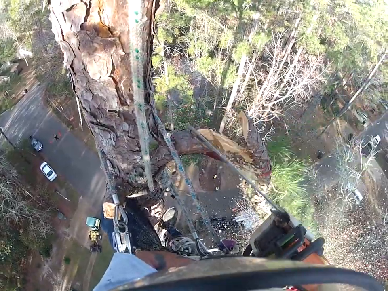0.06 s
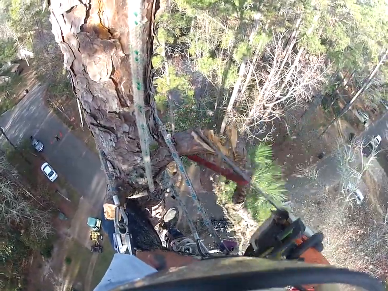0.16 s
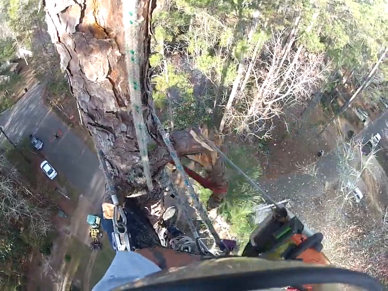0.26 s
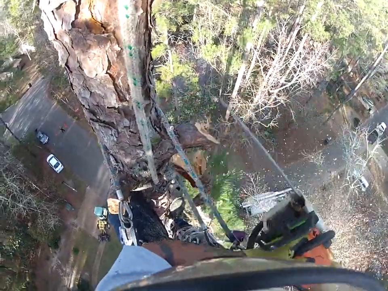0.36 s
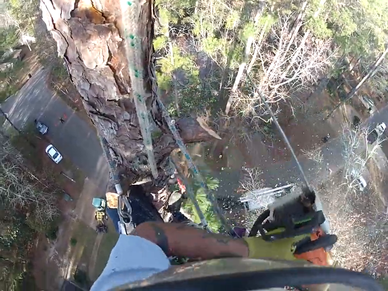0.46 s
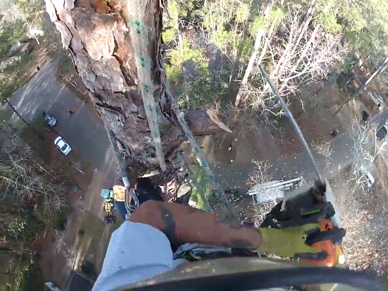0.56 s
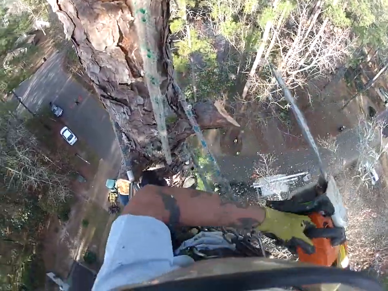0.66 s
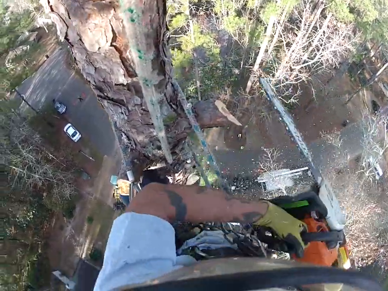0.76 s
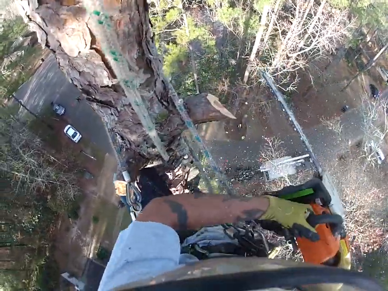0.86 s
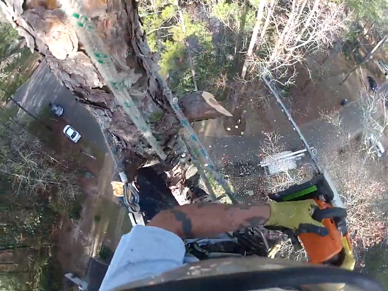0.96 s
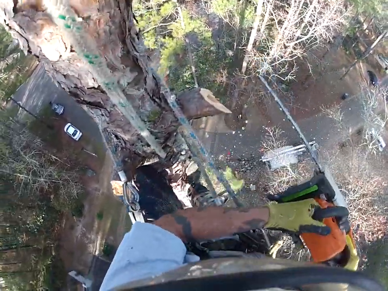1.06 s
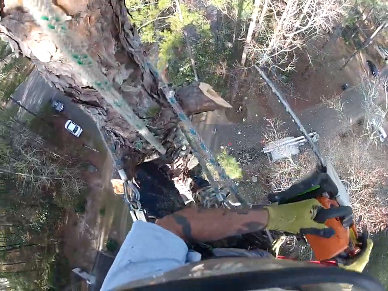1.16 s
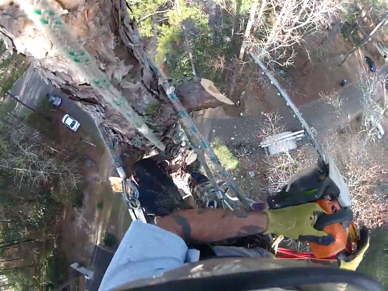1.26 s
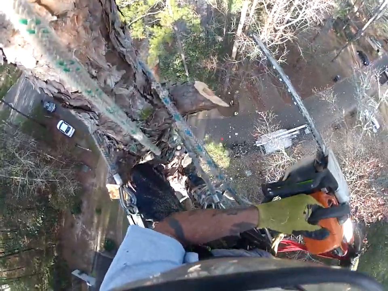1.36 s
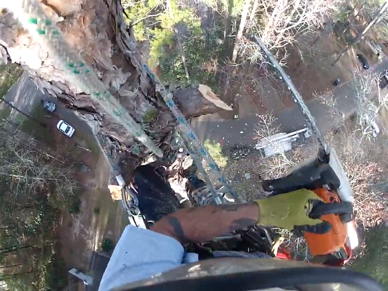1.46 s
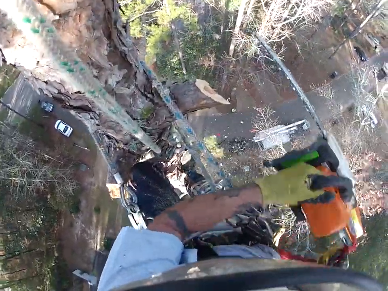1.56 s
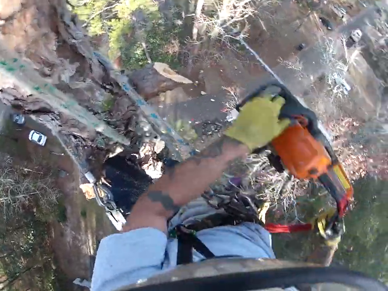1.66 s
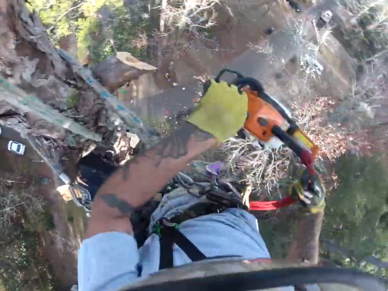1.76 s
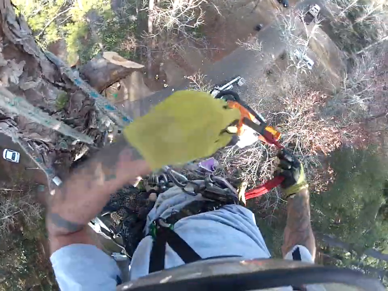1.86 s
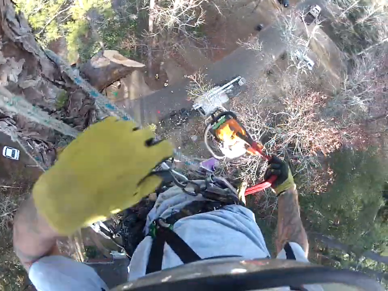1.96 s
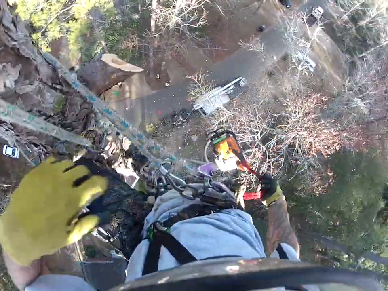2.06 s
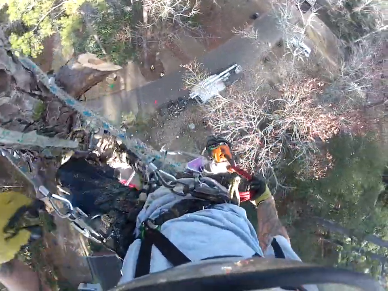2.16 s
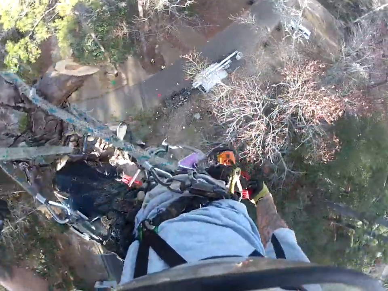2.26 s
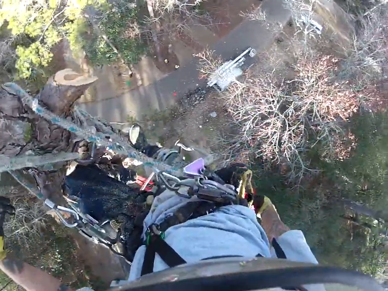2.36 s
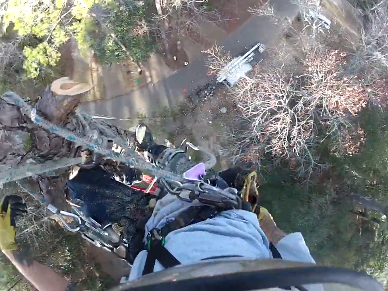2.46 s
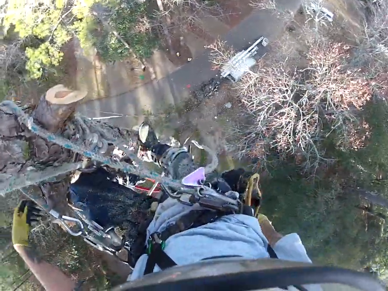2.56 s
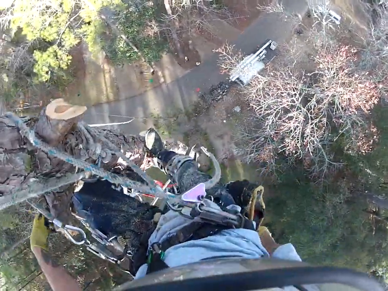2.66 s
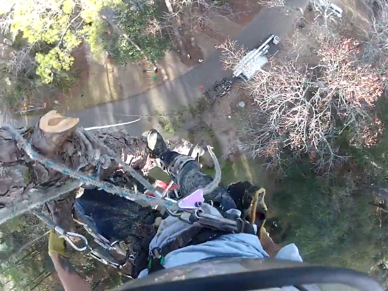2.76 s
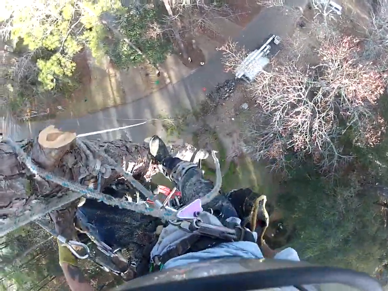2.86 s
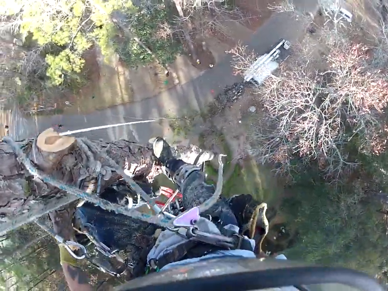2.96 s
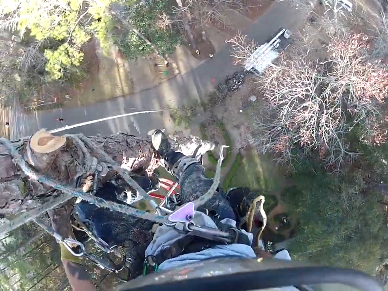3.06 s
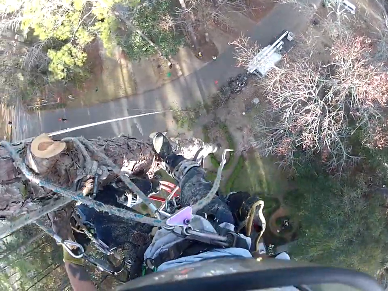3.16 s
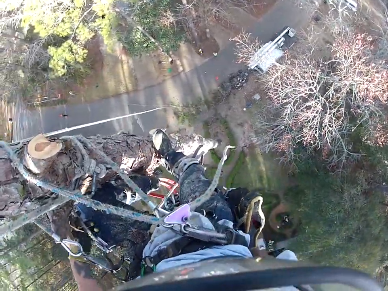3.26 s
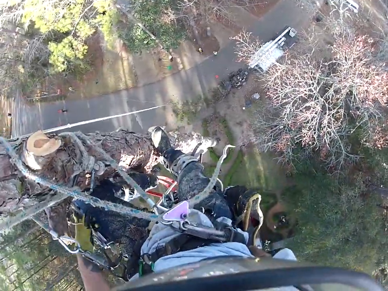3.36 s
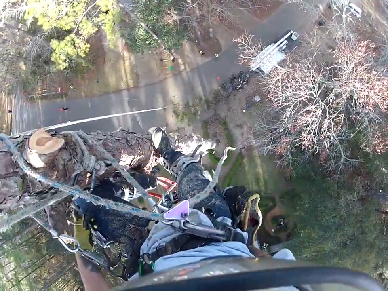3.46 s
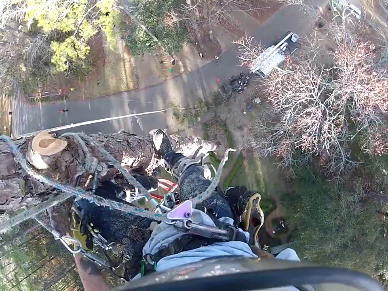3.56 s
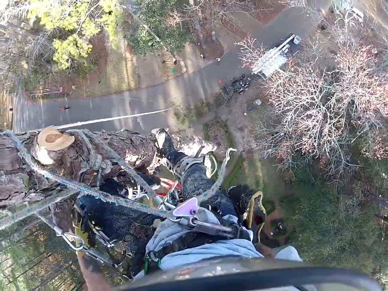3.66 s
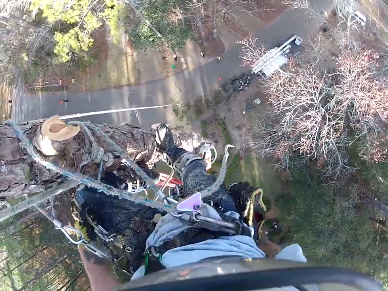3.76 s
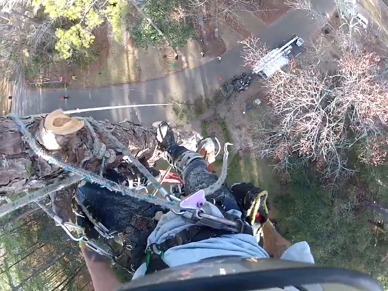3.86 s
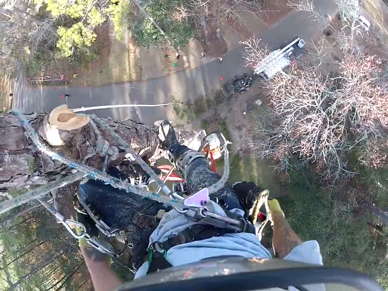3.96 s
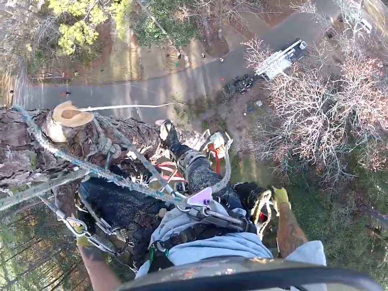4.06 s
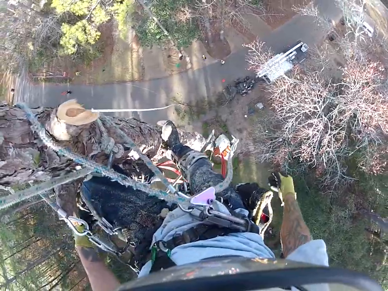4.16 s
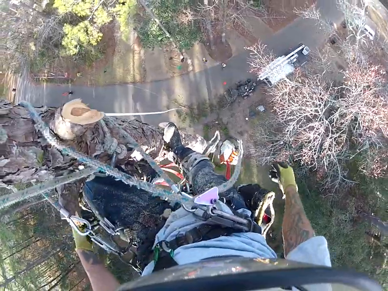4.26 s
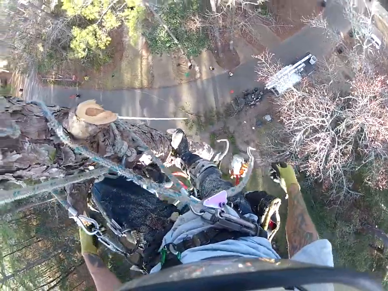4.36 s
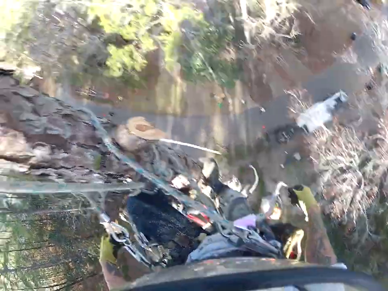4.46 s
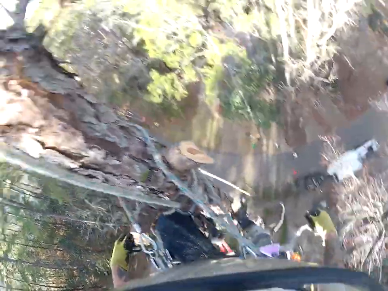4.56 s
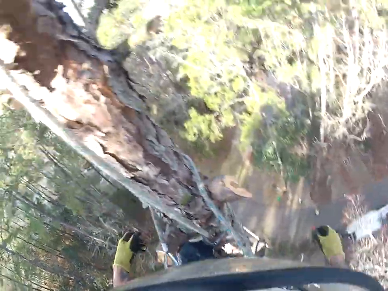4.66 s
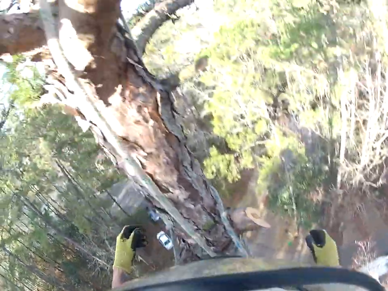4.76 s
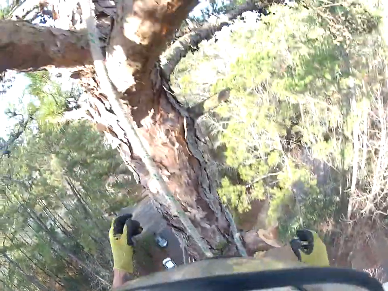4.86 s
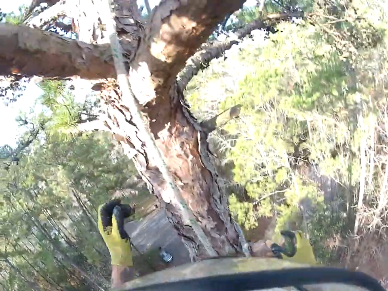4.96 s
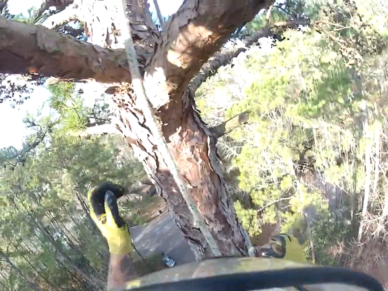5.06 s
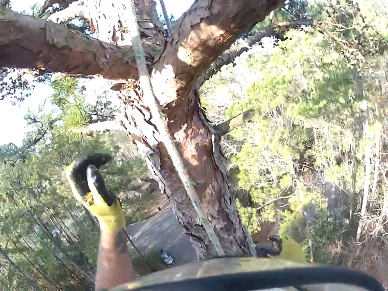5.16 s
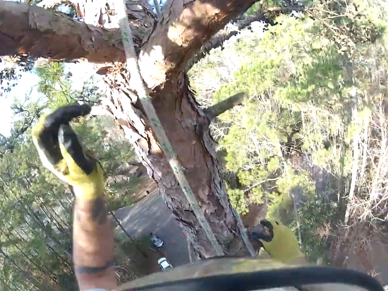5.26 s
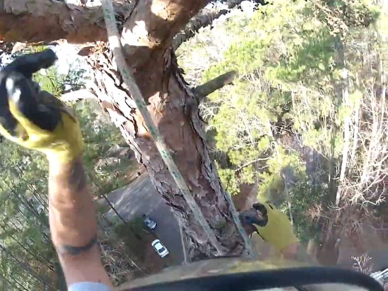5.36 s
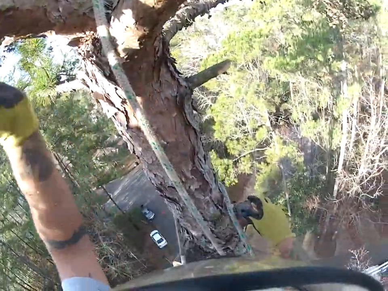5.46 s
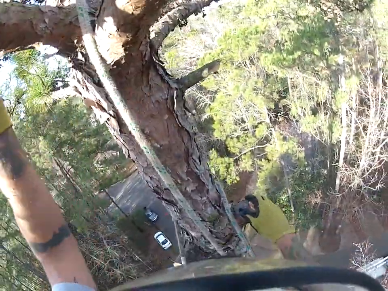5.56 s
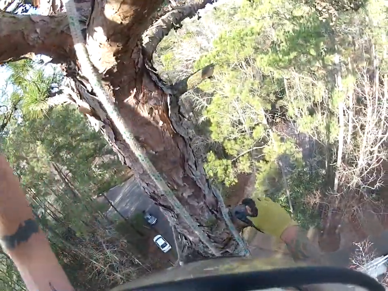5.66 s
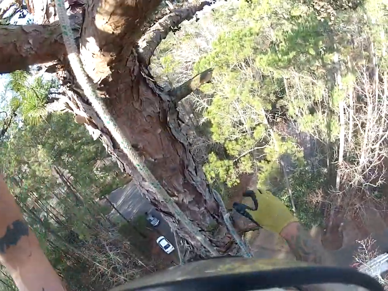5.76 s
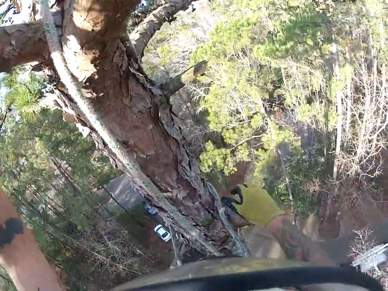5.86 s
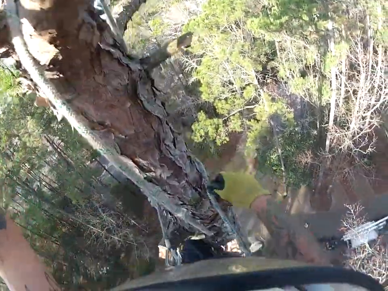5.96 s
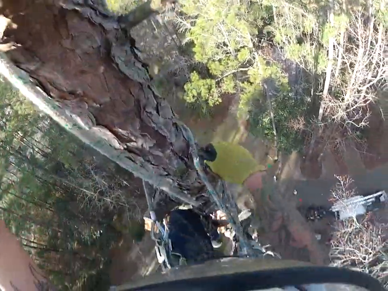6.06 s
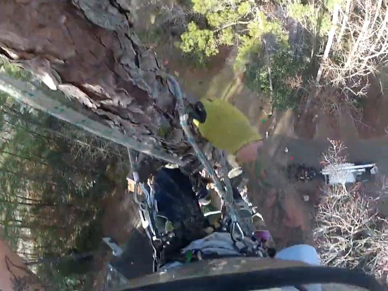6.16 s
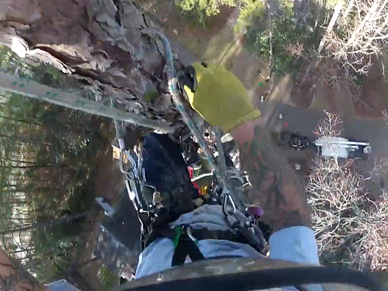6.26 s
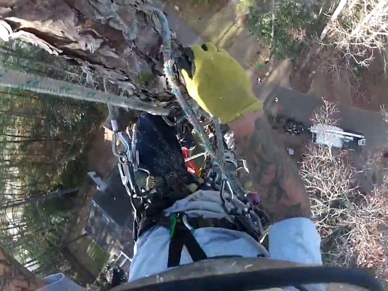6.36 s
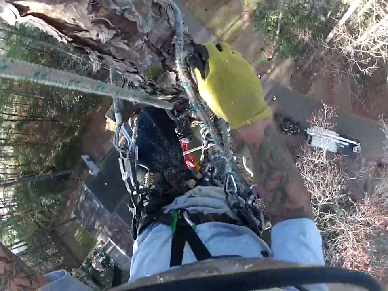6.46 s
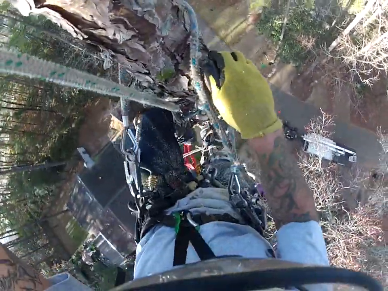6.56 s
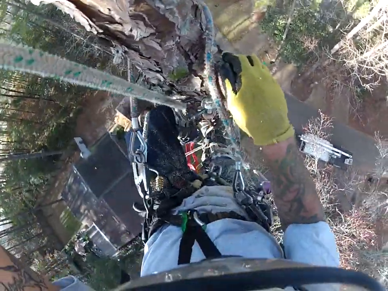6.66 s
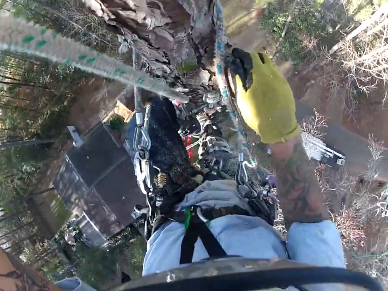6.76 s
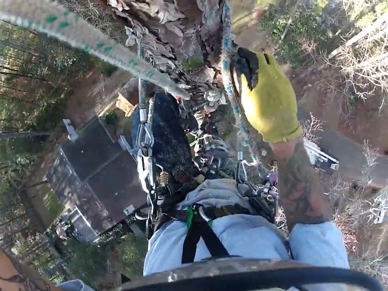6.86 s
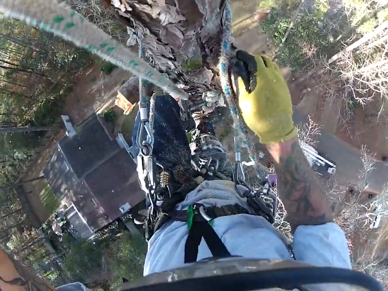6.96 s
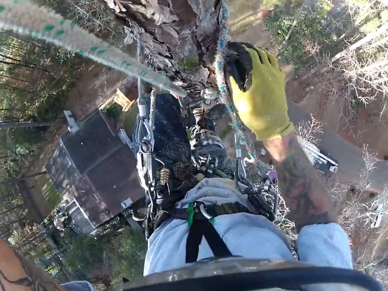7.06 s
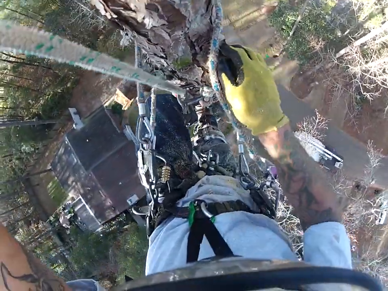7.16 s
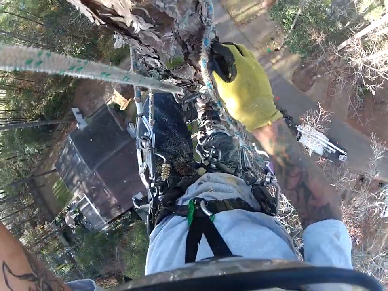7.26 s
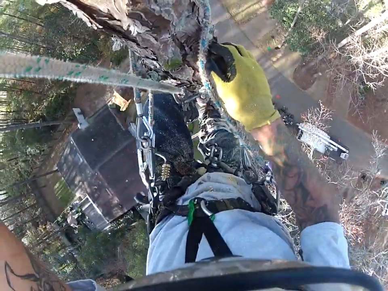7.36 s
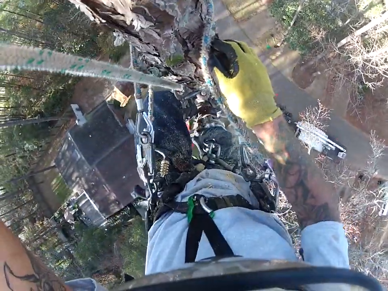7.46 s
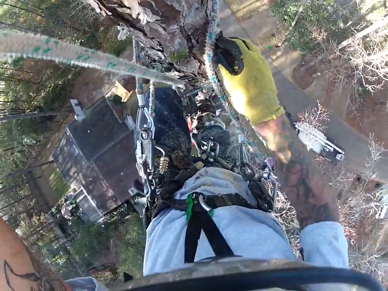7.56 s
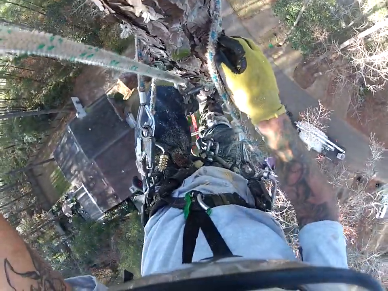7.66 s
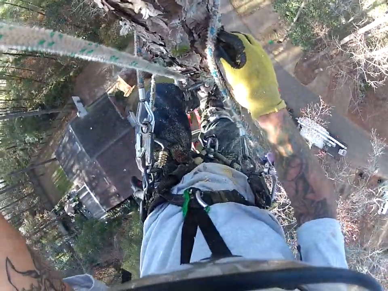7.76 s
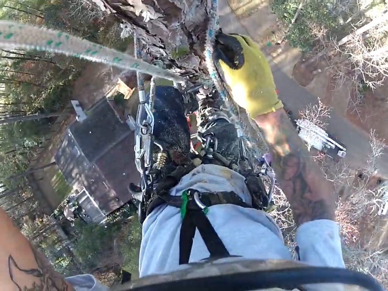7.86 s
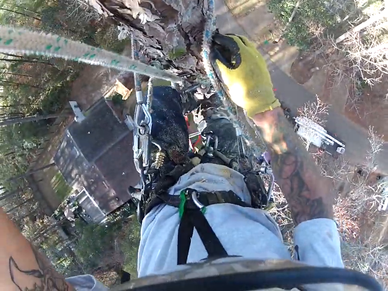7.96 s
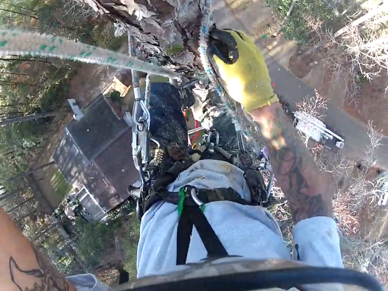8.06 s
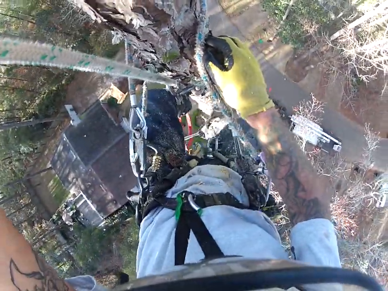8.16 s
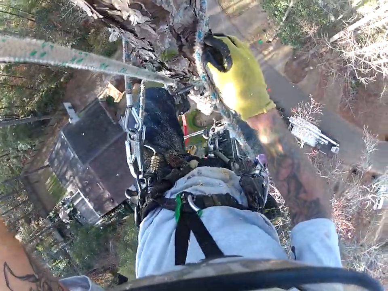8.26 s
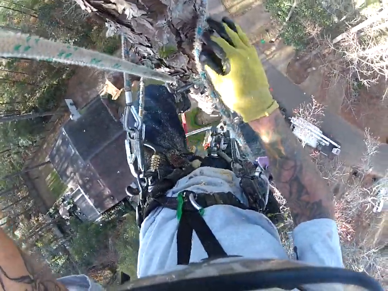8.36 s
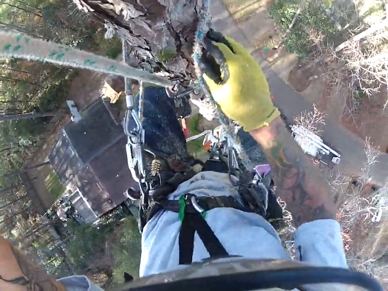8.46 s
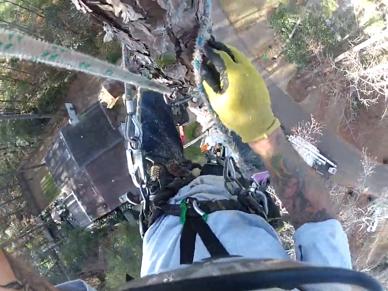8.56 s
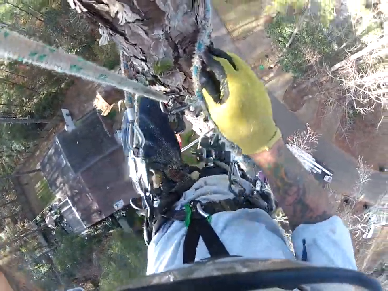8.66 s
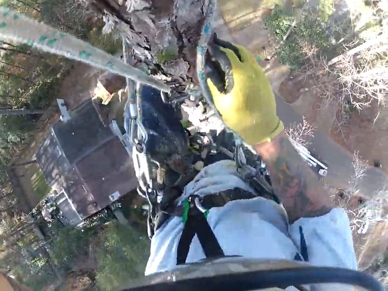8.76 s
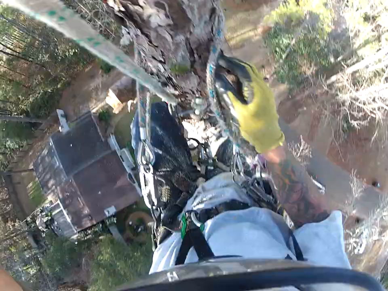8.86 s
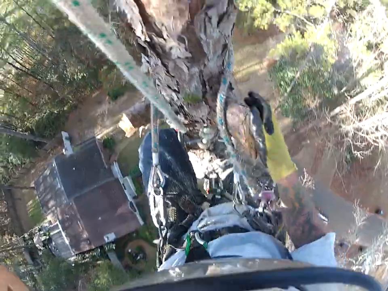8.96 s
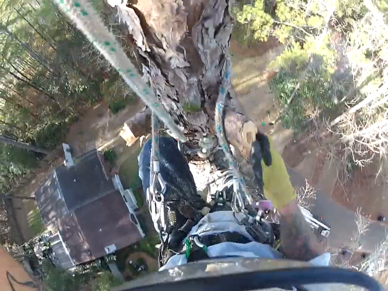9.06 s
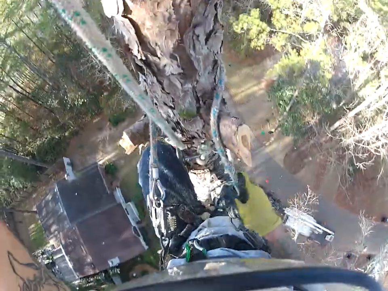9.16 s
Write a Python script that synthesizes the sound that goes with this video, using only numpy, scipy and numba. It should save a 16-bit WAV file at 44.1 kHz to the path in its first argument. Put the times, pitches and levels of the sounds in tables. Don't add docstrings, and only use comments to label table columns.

```python
import sys
import numpy as np
from scipy import signal
from scipy.fft import rfft, irfft
from scipy.io import wavfile
from scipy.ndimage import uniform_filter1d
from numba import njit

SR = 44100
rng = np.random.default_rng(int(sys.argv[2]) if len(sys.argv) > 2 else 0)


def volts(x):
    e = np.asarray(x, float) / 20
    return 10 ** e


def inscribe(sig):
    pcm = np.round(np.clip(np.atleast_2d(sig).T, -1, 1) * 32767)
    wavfile.write(sys.argv[1], SR, pcm.astype(np.int16))


N = 406161
T = np.arange(N) / SR

# centre_hz, width_hz, level_db
HOUSING = [(1070, 108, 0.5), (1546, 203, -6.5), (1850, 87, 4), (2293, 129, 1.5), (2934, 334, 3),
           (3605, 160, 3.5), (4330, 510, -10.5), (5635, 320, -8)]


def unit(x):
    return x / np.sqrt(np.mean(x ** 2))


def noise():
    return rng.standard_normal(N)


def curves(table):
    s, *columns = np.transpose(table)
    return [np.interp(T, s, c) for c in columns]


@njit
def svf(x, hz, widths):
    y, b, l = np.empty(len(x)), 0., 0.
    for i in range(len(x)):
        g, k = np.tan(np.pi * hz[i] / SR), widths[i] / hz[i]
        v = (b + g * (x[i] - l)) / (1 + g * (g + k))
        b, l, y[i] = 2 * v - b, l + 2 * g * v, k * v
    return y


def band(x, hz, width_hz):
    return signal.lfilter(*signal.iirpeak(min(hz, 5950), hz / width_hz, SR), x)


def modes(x, table):
    return sum((-1) ** k * volts(db) * band(x, hz, w) for k, (hz, w, db) in enumerate(table))


def walk(rate_hz, size=N):
    k = int(SR / rate_hz)
    steps = np.repeat(rng.standard_normal(size // k + 1), k)
    return 2.04 * uniform_filter1d(uniform_filter1d(steps, k), k)[:size]


def add(out, s, x):
    i = int(s * SR)
    out[i:i + len(x)] += x[:len(out) - i]


def fade(t60_s, size=8000):
    t = np.arange(size) / SR
    return t, np.exp(-np.log(1000) * t / max(t60_s, .004))


def steady(x, span_s):
    return x / np.sqrt(uniform_filter1d(x ** 2, int(span_s * SR)) + 1e-4 * np.mean(x ** 2))


def wind():
    # centre_s, peak_db, half_length_s
    gust_rows = [(2.253, -48, 0.043), (2.4, -45, 0.036), (2.54, -39, 0.048), (3.066, -43, 0.072),
                 (3.553, -52, 0.17), (4.207, -45, 0.049), (4.757, -38.5, 0.23), (5.417, -43, 0.055),
                 (5.76, -60, .06), (6.107, -49, 0.14), (6.802, -47, 0.087), (7.22, -44.5, 0.21),
                 (7.57, -58, 0.037), (8.032, -43, 0.065), (8.31, -58, 0.04), (8.528, -35, 0.036),
                 (8.802, -41.5, 0.39), (9.156, -47, .04)]
    calm_db, shake_db, shake_end_s = -51.5, -45, 1.7
    push = volts(calm_db) + volts(shake_db) * np.clip((shake_end_s - T) / 0.18, 0, 1)
    push = push + sum(volts(db) * np.exp(-((T - s) / half_s) ** 2) for s, db, half_s in gust_rows)
    gusts = band(noise(), 25, 30) + 0.53 * band(noise(), 102, 41)
    gusts = signal.sosfilt(signal.butter(3, 170, fs=SR, output="sos"), gusts)
    return push * volts(-11.0 + 2.54 * walk(32)) * unit(gusts)


def air():
    # time_s, swell_db, head_raised_0_to_1
    background = [(1.5, 0.5, 0.3), (2.0, -1.5, 0.2), (2.4, 0, 0.3), (3.26, 2, 0), (3.85, 2.5, 0.1),
                  (4.13, 7.5, 0.8), (4.4, 1.5, 0.4), (4.9, -0.5, 1), (5.3, -1.5, 0.95), (6.35, 1, 0.6),
                  (7.3, -1, .8), (8.3, -1, 0.5), (8.9, 0, .8)]
    # freq_hz, density_db_per_hz
    floor = [(12, -26), (20, 2.5), (101, 0.5), (559, -10), (710, -15.5), (1040, -13.5), (1380, -34.5),
             (2170, -16.5), (2630, -21), (3500, -21.5), (3940, -22), (5120, -42.5), (5900, -87),
             (7670, -72), (13000, -120)]
    floor_db, motor_hz, motor_end_s = -57, 112.3, 3.2

    swell_db, raised = curves(background)
    low_db = -64.5 + .4 * swell_db + 4.5 * raised
    upper_db = -61.5 + swell_db - raised
    leaf_db = -66.5 + .8 * swell_db - 0.5 * raised
    hum = volts(low_db + 0.83 * walk(9)) * unit(modes(noise(), HOUSING[:1]))
    hum += volts(upper_db + 0.39 * walk(6.1)) * unit(modes(noise(), HOUSING[1:4]))
    leaves = volts(leaf_db + .8 * walk(8)) * unit(modes(noise(), HOUSING[4:]))

    hz, db = np.transpose(floor)
    log_hz = np.log(np.arange(N // 2 + 1) * SR / N + 1)
    ground = unit(irfft(rfft(noise()) * volts(np.interp(log_hz, np.log(hz), db)), N))

    whine = volts(-80) * unit(band(noise(), 5050, 40))
    for order in (5, 6, 7):
        on = np.clip((motor_end_s - T) / .3, 0, 1) * volts(-79 + 2.5 * walk(2) + 1.5 * (order - 6))
        whine += on * np.sin(2 * np.pi * order * motor_hz * T + walk(4))
    return hum + leaves + volts(floor_db) * ground + whine


def rustle():
    # start_s, length_s, level_db
    brushes = [(3.334, 0.096, -53.5), (3.86, 0.17, -48), (6.58, 0.11, -58.5), (6.685, .07, -57),
               (7.02, 0.13, -56), (8.681, 0.075, -49), (8.86, 0.11, -53), (8.952, 0.04, -50)]
    attack_s, sag_db = 0.013, -16.5
    gain = 0
    for s, length_s, db in brushes:
        on = np.clip(np.minimum(T - s, s + length_s - T) / attack_s, 0, 1)
        gain = gain + on * volts(db + sag_db * np.clip((T - s) / length_s, 0, 1))
    grains = noise() * volts(0.66 * walk(150))
    return gain * unit(modes(grains, HOUSING[3:]) + 0.74 * band(grains, 4100, 3000))


def helmet():
    # start_s, peak_db, pitch_hz, t60_s
    bumps = [(0.959, -31, 89, 0.069), (2.23, -47.5, 34.8, 0.097), (3.009, -59, 80.7, 0.15),
             (3.1, -47, 113, 0.38), (3.442, -47.5, 72.5, 0.43), (4.565, -53, 54.6, 0.12),
             (4.772, -42, 32.6, 0.32), (7.141, -37.5, 91.5, 0.086), (7.174, -39.5, 120, 0.11),
             (7.543, -43.5, 62.7, 0.25), (7.959, -54, 140, 0.11), (8.506, -36, 65.4, 0.06),
             (8.799, -26.5, 102, 0.053), (8.81, -30, 32.4, 0.15), (8.979, -39, 106, 0.063),
             (9.02, -41.5, 115, 0.078)]
    # start_s, level_db, rise_s, t60_s
    rings = [
        (9.008, -47.5, 0.019, 0.25),
        (9.143, -47, 0.006, 0.053),
    ]
    ring_hz = 5386
    out = np.zeros(N)
    for s, db, hz, t60_s in bumps:
        t, decay = fade(t60_s)
        bump = np.sin(2 * np.pi * hz * t) * decay * (1 - np.exp(-t / 0.0058))
        add(out, s, volts(db) * bump / abs(bump).max())

    shove_s, shove_db, rise_s, swing_s, shove_hz = 8.7465, -17.5, .004, .028, 13
    t = T - shove_s
    out -= volts(shove_db) * np.tanh(t / rise_s) * np.exp(-(t / swing_s) ** 2) * np.cos(t * 2 * np.pi * shove_hz)

    for s, db, rise_s, t60_s in rings:
        t, decay = fade(t60_s, size=16000)
        add(out, s, volts(db) * 2 * np.sin(2 * np.pi * ring_hz * t) * decay * np.clip(t / rise_s, 0, 1))
    return out


def ticks():
    clips = 0.016, [(3.3458, -37.5, 4080), (5.9449, -45.5, 5060), (6.3061, -50, 5640), (6.6029, -46, 5560),
             (6.7206, -44, 5560), (6.7421, -36, 5800), (7.0364, -49, 5630), (7.2135, -45, 5620),
             (7.2325, -42, 5830), (7.9009, -52, 5350), (9.1306, -44, 4080), (9.1411, -41, 4900),
             (9.186, -55, 5400)]
    rope = .024, [(1.494, -74, 2960), (3.6416, -47, 2800), (6.7421, -41, 3520), (6.8738, -41, 3350),
            (7.2823, -44.5, 3420), (7.3213, -45, 3340), (8.094, -44, 2920), (8.6951, -37, 2950),
            (8.8697, -43, 3590), (8.9072, -44, 3820), (8.9306, -41, 2850), (8.9474, -51, 2880),
            (8.967, -42, 3450)]
    bark = 0.029, [(3.465, -49, 1800), (4.015, -44, 560), (4.697, -53, 1070), (4.734, -50, 1100),
            (4.77, -49, 1100), (4.791, -46, 1090), (7.131, -34.5, 1160), (7.166, -32, 990),
            (7.528, -48, 1110), (7.982, -42.5, 1050), (8.702, -35.5, 1850), (8.731, -32, 2020),
            (8.737, -43, 3000), (8.782, -42, 2500), (8.816, -32.5, 4050), (8.83, -39, 3000),
            (8.74, -38.5, 546), (8.747, -35.5, 1110), (8.805, -37, 2600)]
    out = np.zeros(N)
    for t60_s, rows in (clips, rope, bark):
        for s, db, hz in rows:
            t, decay = fade(t60_s)
            burst = rng.standard_normal(len(t)) * decay
            wide = band(band(burst, 1.37 * hz, 0.86 * hz), 1.37 * hz, 0.86 * hz)
            tick = band(band(burst, hz, 0.35 * hz), hz, 0.35 * hz) + 0.25 * wide
            if hz < 2400:
                tick = tick + 0.16 * modes(burst, HOUSING[:4])
            add(out, s, volts(db) * tick / abs(tick).max())
    return out


def knocks():
    # start_s, peak_db, pitch_hz, echo_db, shell_share_0_to_1
    knock_rows = [
        (.774, -7.5, 1930, -27, 0.23),
        (4.018, -21, 1800, -30.5, 0),
        (4.035, -33, 1840, -37, 0),
        (4.059, -28.5, 1850, -34, 0.9),
        (4.088, -39, 1860, -26, .2),
        (4.116, -39.5, 1890, -17, .2),
        (8.8142, -15.5, 2650, -41.5, 0.98),
    ]
    cycles, forest_t60_s = 61, 1
    out, wet = np.zeros(N), np.zeros(N)
    for s, db, hz, echo_db, shell in knock_rows:
        t, decay = fade(cycles / hz)
        crack = rng.standard_normal(len(t)) * decay * np.clip(t / 0.0017, 0, 1)
        airborne = modes(crack, HOUSING[:4]) - 0.33 * band(crack, *HOUSING[0][:2])
        airborne = airborne + 0.48 * modes(crack, HOUSING[4:])
        airborne = band(airborne, hz, 800) + 2.4 * airborne + 0.29 * band(crack, 670, 250)
        carried = band(band(crack, hz, 1100), hz, 1200) + 0.14 * band(crack, 0.88 * hz, 840)
        crack = (1 - shell) * airborne + shell * carried + 0.033 * crack
        add(out, s, volts(db) * crack / abs(crack).max())
        add(wet, s + .01, np.array([volts(db + echo_db)]))
    t, decay = fade(forest_t60_s, size=44100)
    trunks = unit(band(modes(rng.standard_normal(len(t)), HOUSING), 1600, 2700)) * decay
    return out + signal.fftconvolve(wet, trunks)[:N]


def muffler_puffs(hz, lit, braked, turn, since_s, chance):
    # centre_hz, width_hz, level_db
    muffler = [(190, 350, 13.5), (697, 28, 29), (1450, 410, -56)]
    free_width_hz, braked_width_hz, slow_hz, soft_hz = 520, 165, 39.4, 45
    puff_hz = np.clip(4.92 * hz, 248, 370)
    narrow_hz = np.clip(braked_width_hz * (slow_hz / hz) ** 2, braked_width_hz, 400)
    width_hz = free_width_hz + braked * (narrow_hz - free_width_hz)

    weak_db = (turn % 2) * (2.5 + 4 * abs(walk(22)))
    fired = volts(1.7 * chance - weak_db) * np.exp(-since_s / 0.00028)
    fired = band(fired, 610, 340) + 1.6 * modes(fired, muffler) + .5 * band(fired, 300, 70)
    fired = signal.sosfilt(signal.butter(4, 140, "highpass", fs=SR, output="sos"), fired)

    pumped = volts(.9 * chance) * np.exp(-since_s / 0.00024) * np.clip(hz / soft_hz, 0, 1) ** 2
    turbulence = np.clip(12 / hz - .05, 0, 1) * since_s / .004 * np.exp(-since_s / .005)
    pumped = pumped + turbulence * noise()
    port = 0.44 * band(pumped, 578, 113) + .5 * modes(pumped, HOUSING[:4])
    pumped = svf(svf(pumped, puff_hz, 1.4 * width_hz), puff_hz, 1.4 * width_hz) + port
    return lit * steady(fired, 0.19) + (1 - lit) * steady(pumped, 0.18)


def links_and_fins(turns, lit):
    firing_db = {10: -4, 14: -41, 15: -40.5, 16: -1, 19: -30.5, 21: -36.5, 22: -30.5, 24: 3.6, 26: 7.4, 27:
                 5.2, 31: 0.45, 37: 4.6, 38: 3.9, 40: -4.5}
    weak_db, fan_fins, free_db = -20, 13, 2.5
    angle = np.pi * turns[:SR // 2]
    size = len(angle)
    loaded = np.zeros(size)
    for k in range(9, 41):
        level = volts(firing_db.get(k, weak_db) + 2.1 * walk(31.7, size=size))
        loaded += level * np.sin(k * angle + 0.77 * walk(49.6, size=size) + 2 * np.pi * rng.random())
    loaded = np.pad(loaded, (0, N - size))

    orders = np.arange(37)
    weight = (orders > 5) + 1.3 * np.exp(-((orders - fan_fins) / 1.2) ** 2)
    pattern = irfft(weight * np.exp(2j * np.pi * rng.random(len(orders))))
    strikes = np.interp(turns % 1 * 72, np.arange(73), np.append(pattern, pattern[0]))
    free = modes(strikes, HOUSING[:6])
    free = free - .7 * band(free, 1560, 220) - .4 * band(free, 2230, 200) - .3 * band(free, 3450, 300)
    return lit * steady(loaded, .1) + (1 - lit) * steady(free, .08) * volts(free_db + 1.1 * walk(25))


def gas_flow(hz, lit, braked, turn, since_s, chance):
    loaded_share, coasting_share, braked_share = 0.75, 0.39, .75
    burst_db = lit * (3.9 * (turn % 2) + 1.8 * chance) + 1.6 * chance
    gas = volts(burst_db) * since_s * np.exp(-since_s / (0.0011 - 0.0006 * lit + 0.14 / hz))
    gas = gas / uniform_filter1d(gas, int(.15 * SR))
    share = lit * loaded_share + (1 - lit - braked) * coasting_share + braked * braked_share
    share = np.clip(share, 0, 1)
    return (share * gas + 1 - share) * noise()


def saw():
    # time_s, turns_per_s
    crank = [(.36, 180.8), (0.63, 124.5), (0.776, 99.45), (0.81, 68.9), (1.03, 50.98), (1.14, 37.93),
             (1.22, 24.2), (1.32, 17.7), (1.5, 10.61)]
    # time_s, rasp_db
    saw_level = [(0, -23), (.08, -19.5), (.35, -21), (.5, -26.5), (.78, -33), (.92, -36), (1.1, -44),
                 (1.25, -54.5), (1.55, -57.5)]
    # centre_hz, width_hz, level_db
    case = [(1750, 170, 3), (2350, 150, -1), (2850, 70, 1), (3450, 200, 1), (4700, 200, -4)]
    ignition_off_s, brake_s = .385, .7742
    bite_hz, bite_s = 5, .04

    (hz,), (rasp_db,) = curves(crank), curves(saw_level)
    hz = hz + bite_hz * np.exp(-T / bite_s)
    octaves = np.log2(crank[0][1] / hz)
    braked = np.clip((T - brake_s) / .03, 0, 1)
    lit = np.clip((ignition_off_s - T) / 0.012, 0, 1)
    puff_db = rasp_db - 7 + 4 * np.clip(octaves, 0, 8.1 - 1.63 * octaves)
    chain_db = rasp_db - 9.5 - 1.5 * octaves - 6 * braked
    whirr_db = -12 * braked

    turns = np.cumsum(hz) / SR
    turns = turns - turns[int(brake_s * SR)] - .07
    turn = np.floor(turns).astype(int)
    turn, since_s = turn - turn[0], turns % 1 / hz
    chance = rng.standard_normal((turn[-1] + 1, 2))[turn].T

    puffs = muffler_puffs(hz, lit, braked, turn, since_s, chance[0])
    whirr = links_and_fins(turns, lit)
    flow = gas_flow(hz, lit, braked, turn, since_s, chance[1])
    rasp = (1 - .72 * braked) * steady(modes(flow, HOUSING[:6]), 0.51)
    rasp += .9 * braked * steady(modes(flow, case), .3)
    rasp += volts(whirr_db) * whirr
    chain = steady(modes(flow + 1.24 * noise(), HOUSING[6:]), 0.047)
    on = np.clip((1.56 - T) / 0.13, 0, 1)
    return on * (volts(puff_db) * puffs + volts(rasp_db) * rasp + volts(chain_db) * chain)


def scene():
    return (wind() + air() + rustle() + helmet() + ticks() + knocks() + saw())[None]


def roll_off(x):
    return signal.sosfilt(signal.butter(12, 16300, fs=SR, output="sos"), x)


def record(dry):
    held_rate_hz, repeat, top_hz = 12000, 8, 15350
    slow = signal.resample_poly(dry, held_rate_hz // 300, SR // 300, axis=1)
    stairs = np.repeat(slow, repeat, axis=1)
    held = signal.resample_poly(stairs, SR // 300, held_rate_hz * repeat // 300, axis=1)
    held = np.pad(held, ((0, 0), (0, 8)))[:, :N]
    held = signal.sosfilt(signal.ellip(10, .2, 70, top_hz, fs=SR, output="sos"), held)
    return roll_off(held)


dry = scene()
out = record(dry)
inscribe(out)
```